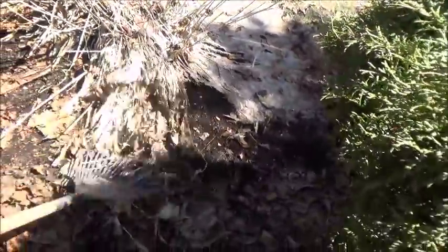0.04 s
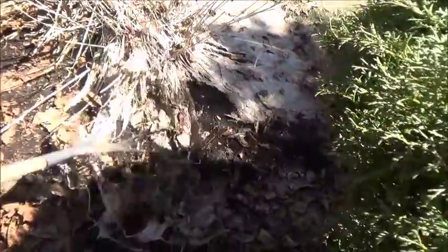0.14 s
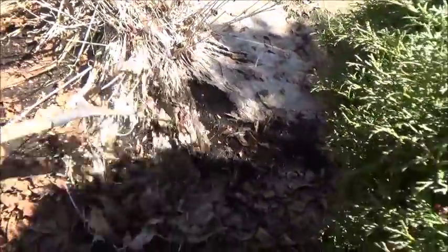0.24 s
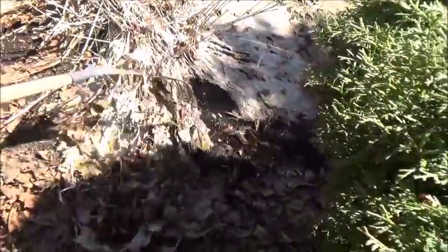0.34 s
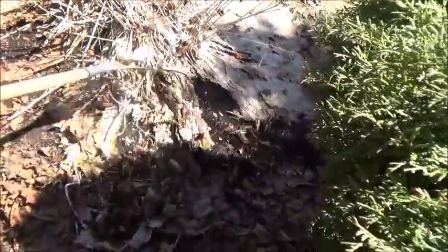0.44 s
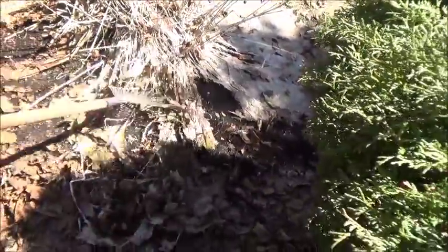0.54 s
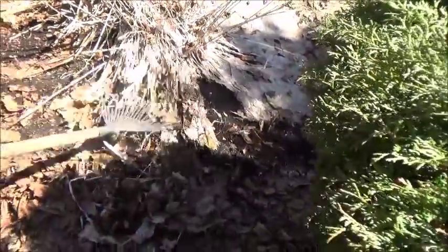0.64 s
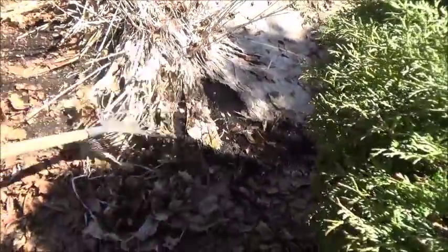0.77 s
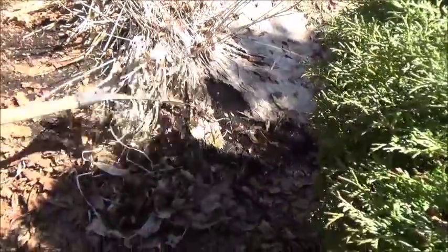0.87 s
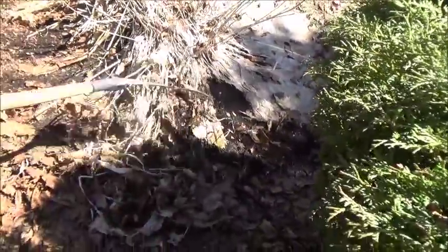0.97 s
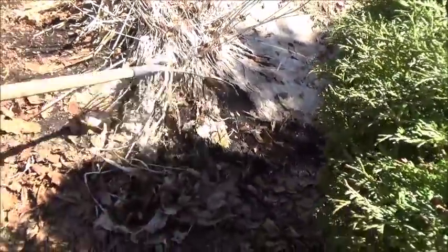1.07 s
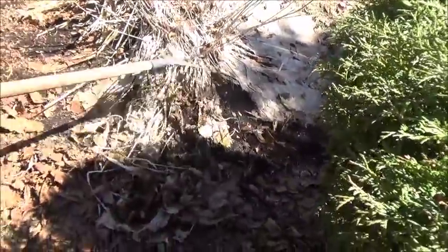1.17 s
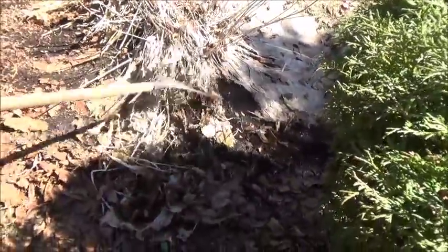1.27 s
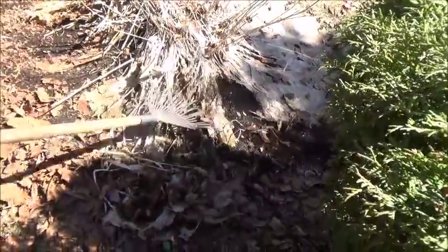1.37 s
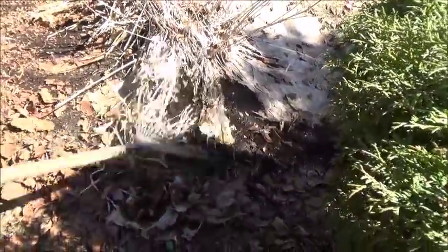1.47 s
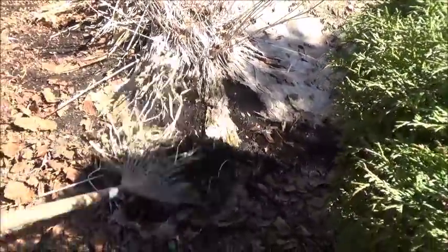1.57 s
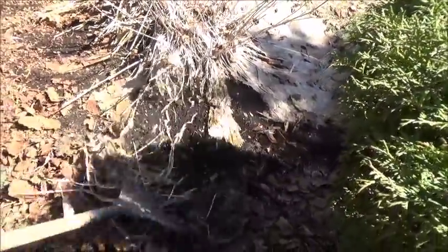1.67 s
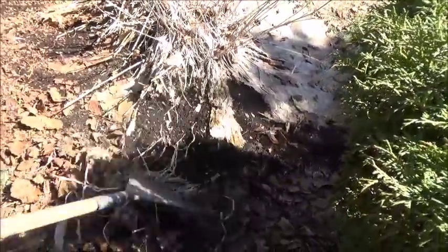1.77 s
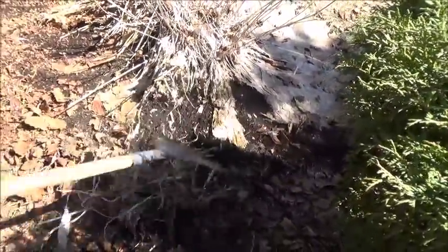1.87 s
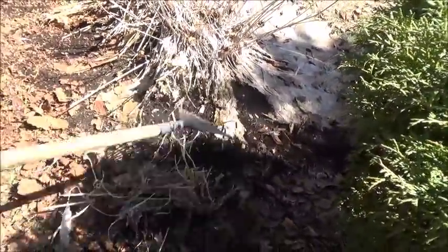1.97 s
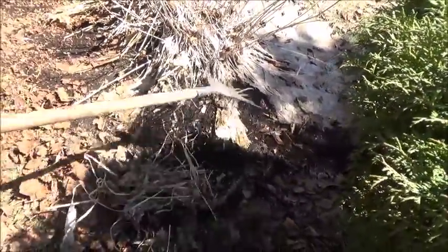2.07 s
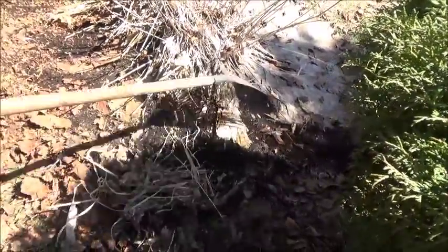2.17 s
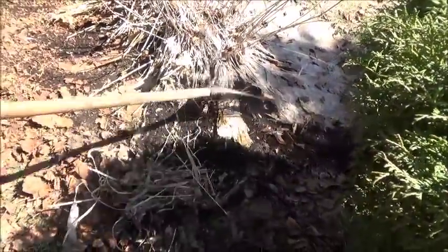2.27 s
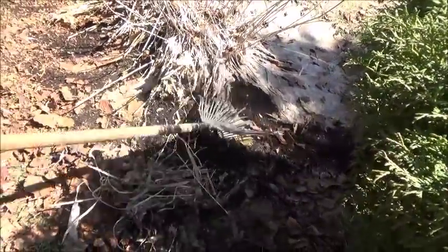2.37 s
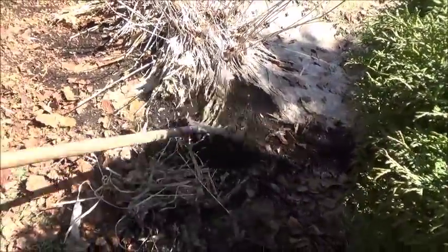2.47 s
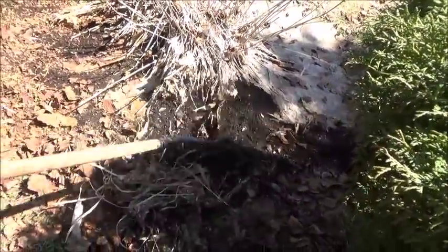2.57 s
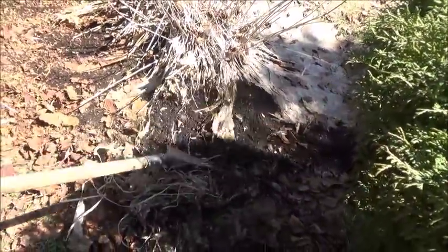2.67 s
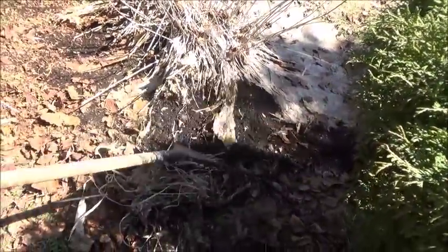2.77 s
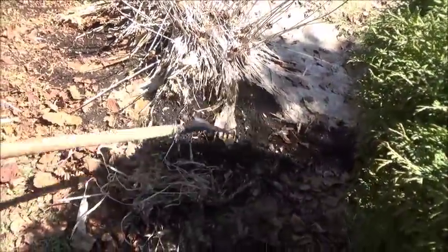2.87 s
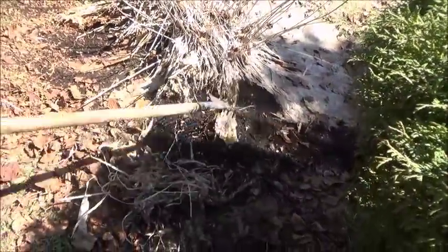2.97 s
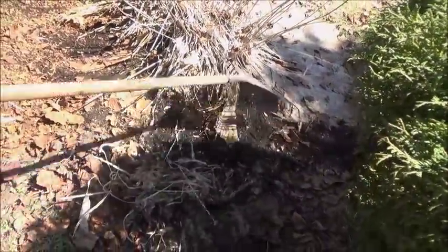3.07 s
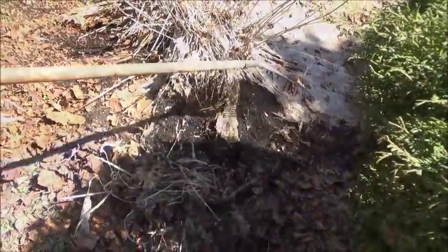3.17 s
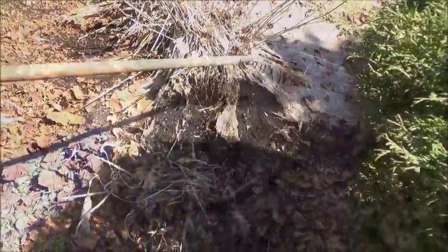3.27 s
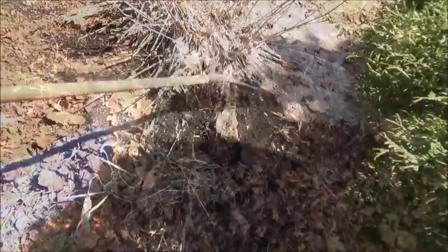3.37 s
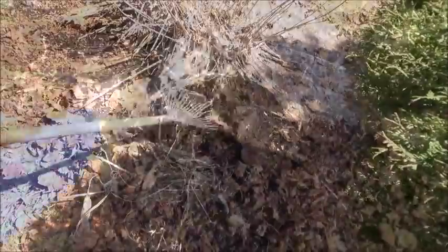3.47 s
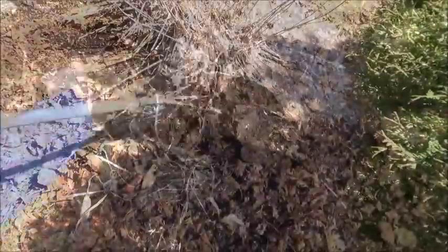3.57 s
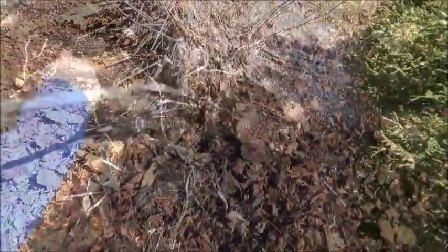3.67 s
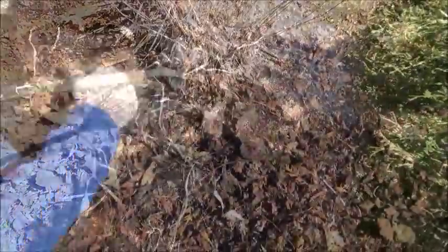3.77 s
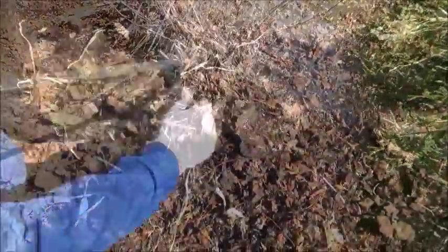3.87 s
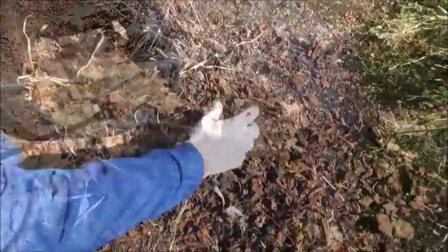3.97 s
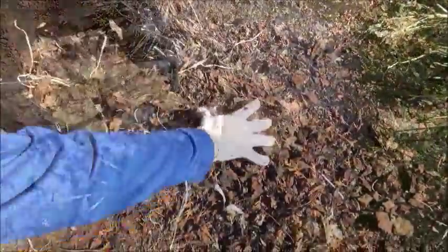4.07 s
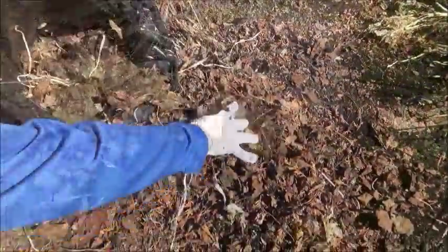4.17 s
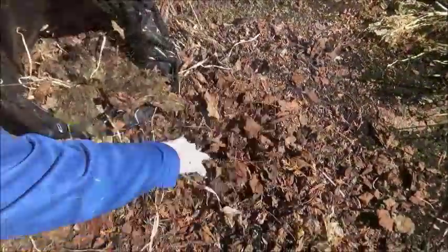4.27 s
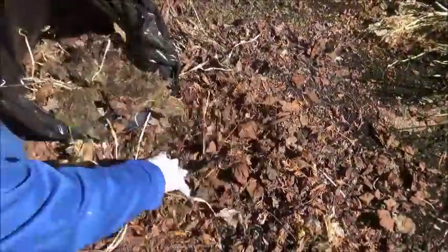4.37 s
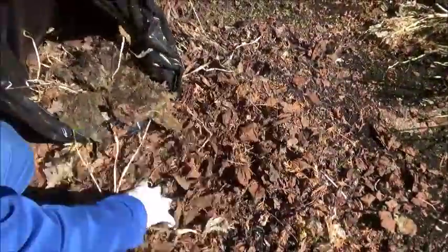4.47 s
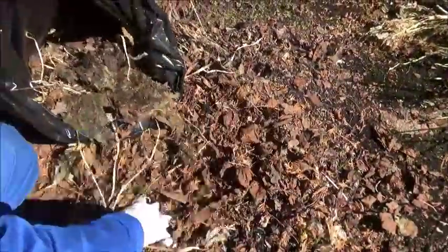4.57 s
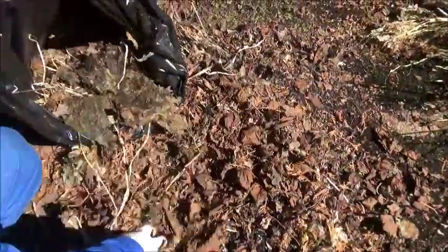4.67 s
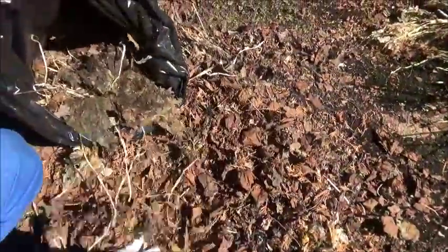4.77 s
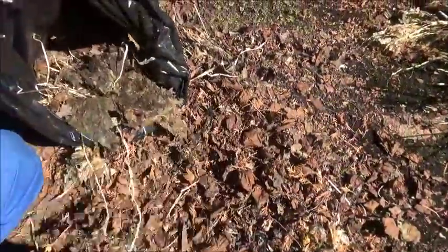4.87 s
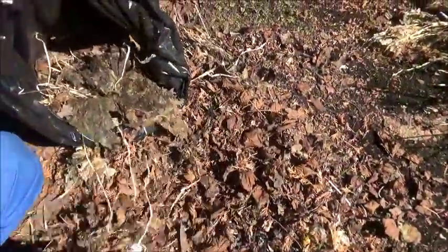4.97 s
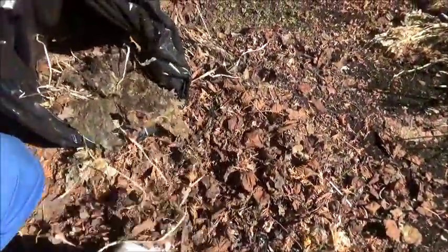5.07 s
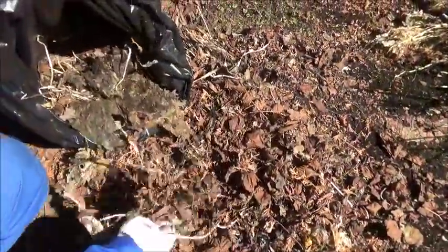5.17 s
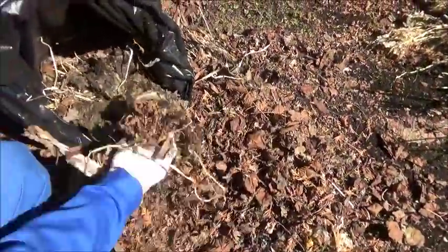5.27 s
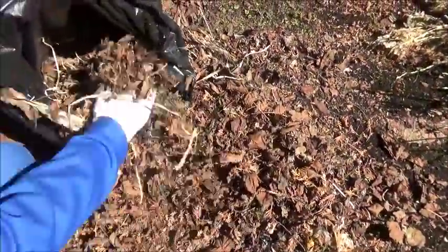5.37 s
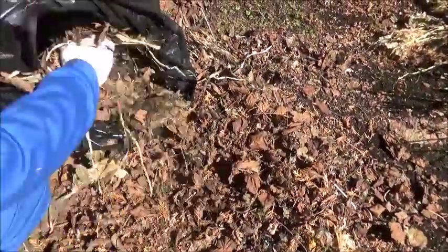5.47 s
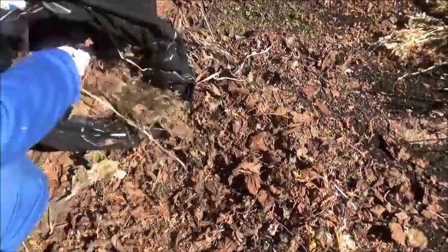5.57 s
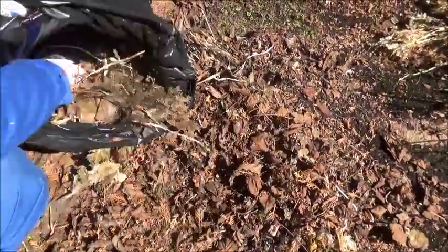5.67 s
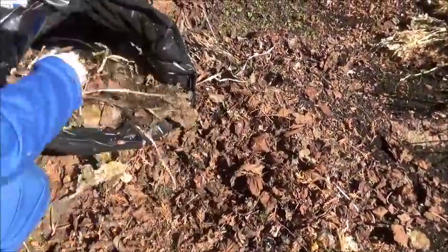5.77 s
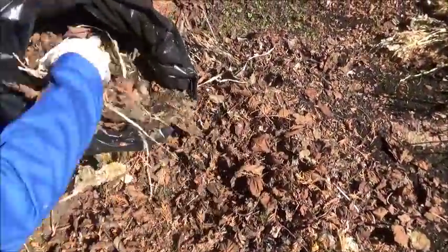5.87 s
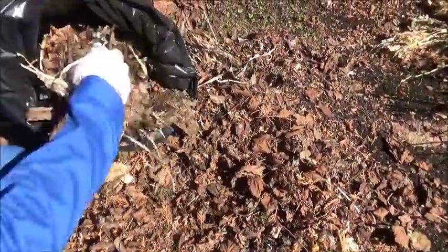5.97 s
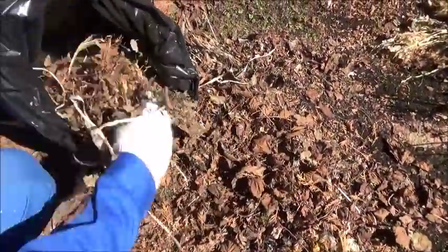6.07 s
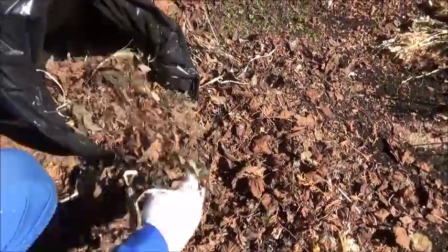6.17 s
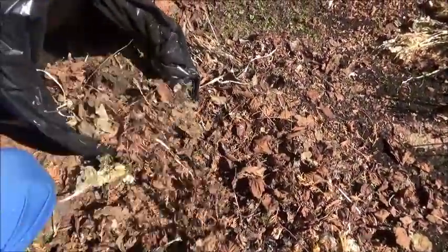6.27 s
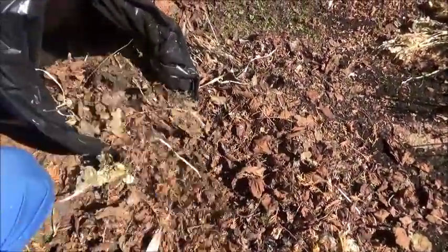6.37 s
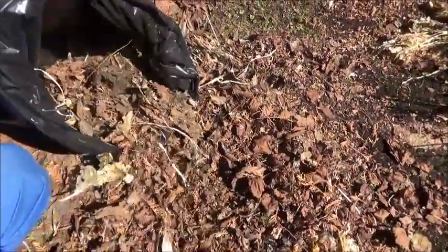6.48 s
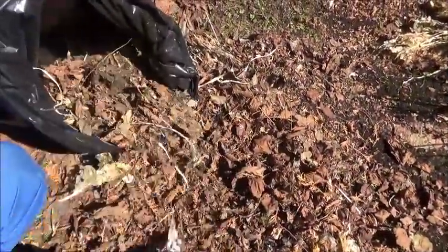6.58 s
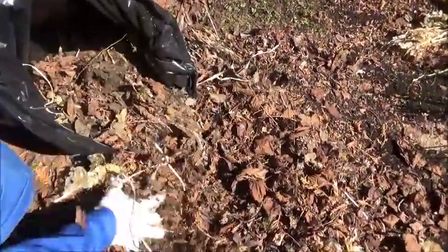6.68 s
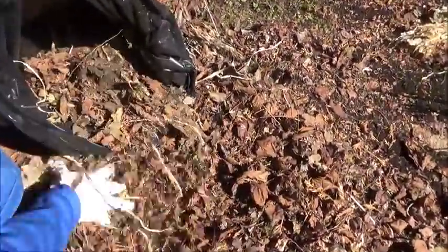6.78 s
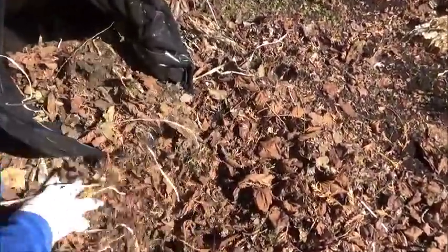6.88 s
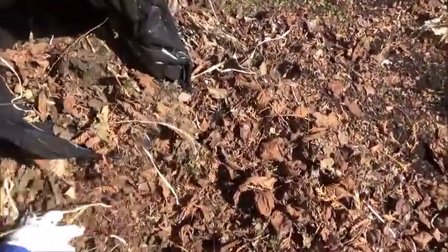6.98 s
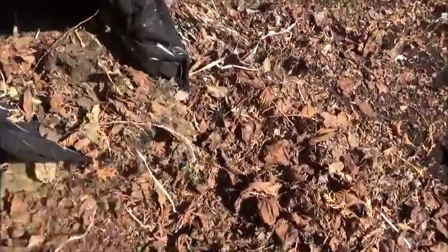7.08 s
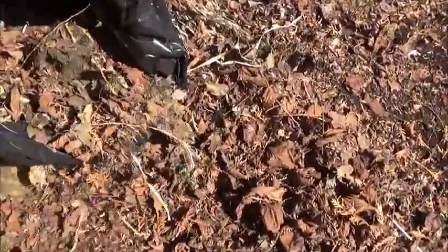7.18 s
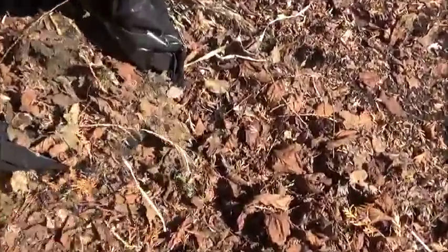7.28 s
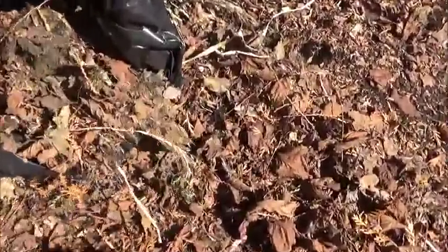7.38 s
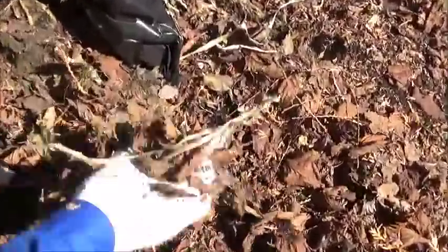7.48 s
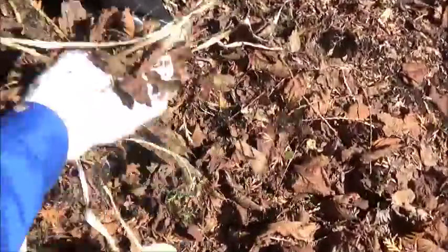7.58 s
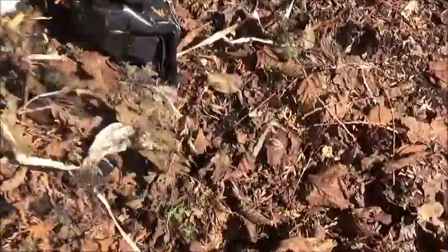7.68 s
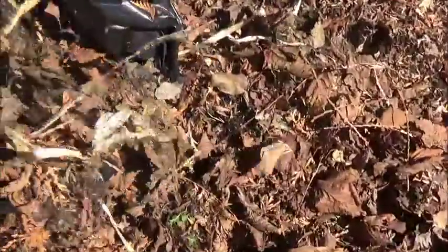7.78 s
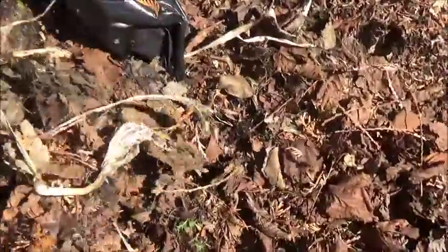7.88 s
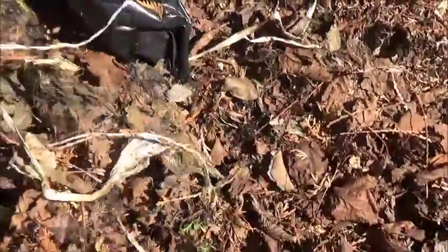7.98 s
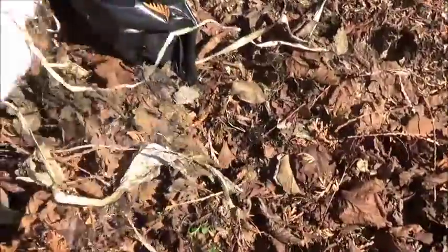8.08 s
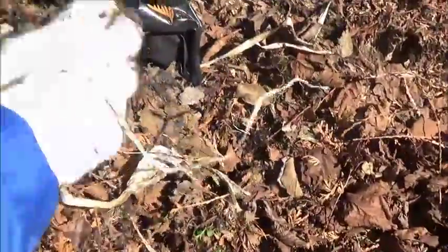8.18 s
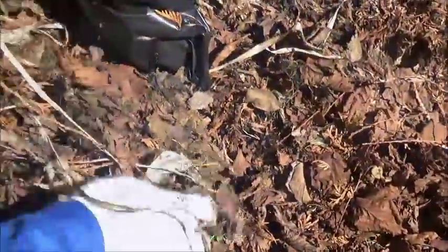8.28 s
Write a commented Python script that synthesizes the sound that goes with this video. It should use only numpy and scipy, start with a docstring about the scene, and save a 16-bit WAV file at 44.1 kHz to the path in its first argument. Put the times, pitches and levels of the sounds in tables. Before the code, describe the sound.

Dry leaves crackle and twigs snap under repeated rake strokes, the metal tines ticking faintly, with a faint low hum behind. Then a hand gathers the leaves in several crisp, rustling scoops and pushes them into a plastic sack, which adds a soft hollow sound. The work is outdoors, close by and a little to the left, over a quiet rumble and slight air movement at the microphone.

```python
"""Dry leaves crackle under a rake, close to the microphone and a little to its left.
Each stroke is thousands of tiny fractures; stiffer twigs snap out of the mass and the steel tines ring on.
From about four seconds a gloved hand scoops the litter into a plastic sack; heap and sack add a dull body.
Air stirs at the microphone over a distant rumble, and a low hum stands behind the raking.
Near the end something bumps softly and a faint tone rises."""
import sys
import numpy as np
from scipy import signal
from scipy.fft import rfft, irfft, next_fast_len
from scipy.io import wavfile
from scipy.ndimage import map_coordinates

SR = 44100
rng = np.random.default_rng(int(sys.argv[2]) if len(sys.argv) > 2 else 0)


def dump_mix(stems):
    """Bounce the given channels to the path in sys.argv[1] as a 16-bit WAV at rate SR."""
    frames = np.atleast_2d(stems).T  # one column per channel
    limited = np.clip(frames, -1, 1)  # hard clip at full scale
    pcm = np.round(limited * 32767).astype(np.int16)
    wavfile.write(sys.argv[1], SR, pcm)


N = 367353
TIME_S = np.arange(N) / SR
HAND_FROM_S = 3.945  # the scene changes: raking before, the gloved hand after


def amp(db):
    """Gain of a level in dB."""
    return 10 ** (np.asarray(db) / 20)


def along(points, hz):
    """Read (pitch_hz, value) points on a log pitch axis."""
    pitches, values = np.transpose(points)
    return np.interp(np.log(hz + 1), np.log(pitches + 1), values)


def curves(rows):
    """One value per sample for each column after the time."""
    times, *columns = np.transpose(rows)
    return [np.interp(TIME_S, times, column) for column in columns]


def wobble(per_s):
    """A smooth random curve with per_s knots a second."""
    knots = rng.standard_normal(int(N / SR * 200) + 4)
    return map_coordinates(knots, [TIME_S * per_s])


def filtered(x, response):
    """Shape x by a gain that depends on frequency."""
    size = next_fast_len(N + 8192)
    return irfft(rfft(x, size) * response(np.fft.rfftfreq(size, 1 / SR)), size)[..., :N]


def thinned(x):
    """Roll off the bass below 700 Hz, leaving clicks dry."""
    return filtered(x, lambda hz: hz ** 4 / (hz ** 4 + 700 ** 4))


def dying(power, t60):
    """Every impulse of power fades over t60 seconds; the mean is kept."""
    keep = amp(-120 / (t60 * SR))
    return signal.lfilter([1 - keep], [1, -keep], power)


def fractures(per_s, spread_db):
    """Tiny breaks at random times: impulses of power, mean about 1, all equal if spread_db is 0."""
    size = amp(2 * spread_db * np.minimum(rng.exponential(size=N), 4))
    return (rng.random(N) < per_s / SR) * size / np.mean(size) * SR / per_s


def pings(start_s, db, hz, t60):
    """Damped sines that swell over a fraction of a cycle and are cut off after 25 ms."""
    age = np.arange(1100)
    turns = hz[:, None] * age / SR
    decay = amp(db[:, None] - 60 * age / SR / t60[:, None])
    rings = decay * np.sin(2 * np.pi * turns) * (1 - np.exp(-turns / 0.17))
    at = np.round(start_s * SR).astype(int)[:, None] + age
    return np.bincount(at.ravel(), rings.ravel(), N + len(age))[:N]


def swells(start_s, end_s, db, end_db, rise, fall, bed_db):
    """Level in dB of sounds that rise, hold and fall, summed over a bed."""
    t = TIME_S[::32, None]
    hold = db + (end_db - db) * np.clip((t - start_s) / np.maximum(end_s - start_s, 1e-3), 0, 1)
    level = hold - rise * np.maximum(start_s - t, 0) - fall * np.maximum(t - end_s, 0)
    power = np.interp(TIME_S, t[:, 0], amp(2 * level).sum(axis=1))
    return 10 * np.log10(power + amp(2 * bed_db))


def stray_breaks(leaf_db, over_db, scatter_db, count):
    """Random times, levels above the stroke of the moment, and a 0-1 place in a pitch range."""
    when, size, place = rng.random((count, 3)).T
    db = leaf_db[(when * N).astype(int)] + over_db + scatter_db * (size - .5)
    return when * (N - 1) / SR, db, place


# Width of the litter from the microphone: pitch_hz, side_minus_mid_db
SIDE_SPECTRUM = [(60, -21), (250, -20), (550, -20), (1500, -15), (2700, -14), (4500, -20), (8000, -14),
                 (12000, -20)]


def voiced(power, colour):
    """Coloured noise under a power envelope; unrelated mid and side give it width."""
    colour_rms = np.sqrt(np.mean(amp(2 * along(colour, np.linspace(0, SR / 2, 4000)))))
    shape = lambda hz: amp(along(colour, hz) + np.array([0 * hz, along(SIDE_SPECTRUM, hz)])) / colour_rms
    return filtered(np.sqrt(power) * rng.standard_normal((2, N)), shape)


# Strokes of rake, then hand, on the ground close by:
# full_s, release_s, level_db, release_db, rise_db_per_s, fall_db_per_s
STROKES = [(0, 0.146, -15.5, -16, 502, 123), (0.302, 0.48, -29.5, -27.5, 105, 302),
           (0.511, 0.579, -17, -18, 799, 280), (0.685, 0.833, -13.5, -19, 253, 115),
           (0.923, 1.01, -37, -28.5, 100, 75), (1.18, 1.312, -29, -43, 405, 206),
           (1.336, 1.699, -17, -14.5, 130, 93), (1.825, 2.062, -24.5, -25, 200, 402),
           (2.065, 2.2, -31.5, -35.5, 300, 600), (2.247, 2.356, -27, -23.5, 500, 300),
           (2.378, 2.66, -20, -24, 285, 222), (2.707, 2.81, -27, -37.5, 200, 144),
           (2.857, 3.022, -26.5, -25.5, 150, 600), (3.073, 3.162, -21.5, -19.5, 702, 902),
           (3.174, 3.242, -17.5, -22.5, 900, 498), (3.288, 3.288, -29, -26, 500, 350),
           (3.356, 3.427, -24, -13.5, 900, 900), (3.439, 3.554, -16, -17, 900, 200),
           (3.61, 3.73, -23, -27, 300, 66), (3.939, 3.94, -29, -25.5, 250, 1502),
           (4.229, 4.546, -15, -16.5, 342, 87), (4.716, 4.774, -16, -19.5, 143, 172),
           (4.846, 5.036, -16.5, -19.5, 214, 62), (5.203, 5.42, -30, -28, 102, 202),
           (5.491, 5.619, -18.5, -24.5, 252, 69), (5.783, 6.017, -34, -32, 100, 200),
           (6.026, 6.24, -35, -25, 200, 193), (6.393, 6.49, -15, -16.5, 92, 227),
           (6.59, 6.947, -13, -18, 201, 902), (6.962, 7.345, -16.5, -16.5, 900, 142),
           (7.408, 7.606, -25, -28.5, 196, 203), (7.702, 7.844, -16.5, -23.5, 203, 81),
           (7.947, 8.148, -28.5, -41.5, 192, 22)]


def strokes():
    """Level in dB of the stirred leaves, which go on settling quietly between strokes."""
    return swells(*np.transpose(STROKES), bed_db=-41)


# What is being stirred, and where: time_s, woody_db, treble_db, left_bias_db
PATCH = [(0, 1, 2, 2.5), (.28, -2.5, -1, 1.5), (.52, -1.5, 2.5, 3), (.62, -1.5, 2, 1), (.8, -1, 3.5, 1),
         (1.0, -1.5, 0, 4.5), (1.15, -2, 1.5, 0.5), (1.35, -3, 2, 0.5), (1.47, -1, 4, 1),
         (1.56, 0.5, 1.5, 2.5), (1.72, 0.5, 0, 0.5), (1.8, -0.5, 0.5, 2.5), (1.9, -1.5, -0.5, 4.5),
         (2.12, -1.5, 1, 2), (2.3, -0.5, 2, 0.5), (2.6, -3, 3, 0.5), (2.75, -2, 1, 3.5),
         (2.83, 1.5, -2.5, 7.5), (2.95, 2.5, -2.5, 9.5), (3.05, 3, -4, 7.5), (3.15, 3.5, -4.5, 8),
         (3.3, -0.5, -3, 6.5), (3.42, -1.5, 4, 0), (3.55, 2.5, 5, 1.5), (3.66, 1.5, 2.5, 2.5),
         (3.9, 1, -0.5, 3.5), (4.15, 2, 2.5, 3.5), (4.23, 1, 4, -1), (4.33, 4.5, -1, 0.5),
         (4.52, 4.5, -2.5, 3), (4.72, -1, -1, 1.5), (4.81, 1.5, -3, 2), (4.88, 4.5, -1.5, 3),
         (5.05, 1.5, -1, 2.5), (5.35, -3, 1.5, 2), (5.65, 6.5, 0, 4.5), (6.1, 1.5, 2.5, 3.5),
         (6.5, -3.5, 0.5, -0.5), (6.7, 0.5, 1.5, 0.5), (6.95, 3, -0.5, 5.5), (7.1, 1, -4, 4.5),
         (7.22, 1, -1.5, 1.5), (7.36, -3, -2.5, 0), (7.55, -4.5, 0, 0), (7.78, 5, 3, 3),
         (8.0, 2.5, -0.5, 3), (8.33, 0, 6.5, 1)]
# Colours of the litter at close range: pitch_hz, density_db
LEAF = [(3000, -70), (5000, -17.5), (6800, -5), (8000, -0.5), (8800, 0), (9700, -2), (10500, -9),
        (13000, -18)]
DUST = [(5000, -66), (8000, -5.5), (10500, 0.5), (11500, -1.5), (12700, -3.5), (14000, -11.5), (15600, -22),
        (17000, -27)]
COARSE = [(1500, -70), (3000, -23), (4200, -5), (5500, -1.5), (6800, -0.5), (9000, -12), (14000, -60)]
TWIG = [(200, -68), (500, -12.5), (1100, -7), (2100, -0.5), (3300, 0.5), (4200, -2), (6000, -8.5),
        (12000, -58)]
HEAP = [(60, -65), (150, -22), (320, -6.5), (600, 3.5), (800, 0), (1100, -1.5), (1900, -9.5), (5000, -62)]
FISTFUL = [(350, -60), (600, -5), (800, -6), (1150, -8), (1500, -7), (2000, -6.5), (3200, -18), (6000, -70)]  # crunched in the glove


def litter(leaf_db):
    """Leaves, dust, twigs and heap break together; harder stirring packs the fractures closer."""
    woody_db, treble_db, _ = curves(PATCH)
    raking = TIME_S < HAND_FROM_S
    weak_db = -20 - leaf_db  # how far below a firm stroke
    dust_db = -6.5 + .1953 * weak_db + 1.5 * treble_db
    coarse_db = -7.5 + .28 * weak_db + .89 * woody_db + .5 * treble_db
    twig_db = -9 + .2618 * weak_db + woody_db
    heap_db = -20.5 + .7563 * weak_db + 2.01 * woody_db + treble_db
    heap_db += np.where(raking, 0, -7)  # fingers stir the heap less than tines
    per_s = 1600 * amp(0.36 * (leaf_db + 26))
    # Tines break fewer and larger pieces than fingers.
    shared = np.where(raking, fractures(.6 * per_s, spread_db=0), fractures(per_s, spread_db=0))
    own = fractures(per_s / 2, spread_db=2)
    lumpy = np.clip(1 - (leaf_db + 24) / 12, .2, 1)  # above -24 dB a stroke rustles more evenly
    # Tines and fingers catch and let go.
    clumps = amp(lumpy * (0.76 * wobble(12) + 2.6 * wobble(30) + 2.1 * wobble(90)))
    clumps /= np.mean(clumps)
    layers = ((LEAF, -.6, .004, .25, .5),
              (DUST, dust_db, .004, .3, .45),
              (COARSE, coarse_db, .006, .25, .5),
              (TWIG, twig_db, .011, .3, .45),
              (HEAP, heap_db, .02, .25, .3),
              (FISTFUL, np.where(raking, -90, -26), .012, .1, .3))
    rustle = 0
    for colour, above_db, t60_s, hiss_share, common_share in layers:
        own = np.roll(own, N // len(layers))  # each layer breaks at its own moments
        breaks = common_share * shared + (1 - hiss_share - common_share) * own
        grain = hiss_share + dying(breaks, t60_s)
        power = clumps * (1 + np.sqrt(lumpy) * (grain - 1))
        rustle = rustle + voiced(power * amp(2 * (leaf_db + above_db)), colour)
    rustle[0] += thinned(stems(leaf_db + twig_db, count=1200))
    return rustle


def stems(level_db, count):
    """Small stems break at random, each a dry click of 5 to 27 cycles."""
    when, smallness, place, life = rng.random((count, 4)).T
    hz = 1000 * 4.5 ** place
    db = level_db[(when * N).astype(int)] + 3 - 2.3 * np.log(smallness + 0.035)
    return pings(when * N / SR, db, hz, (5 + 22 * life) / hz)


def flakes(leaf_db):
    """Single leaves crack out of the rustle as very short bright clicks."""
    start_s, db, place = stray_breaks(leaf_db, over_db=9, scatter_db=7, count=700)
    hz = 6500 * 1.53 ** place
    return pings(start_s, db, hz, t60=10 / hz)


# Rumble in the distance: time_s, level_db
RUMBLE = [(0.0, -46), (0.14, -57), (3.78, -50), (4.6, -60), (5.1, -61), (5.73, -50), (6.49, -59),
          (7.98, -52), (8.33, -52)]
# Heap and sack shoved close by: start_s, level_db, fall_db_per_s
SHOVES = [(.51, -50, 70), (1.32, -49, 152), (2.39, -47, 150), (3.411, -50, 150), (3.525, -38, 600),
          (3.67, -47, 45), (4.45, -45, 115), (5.42, -42, 16), (5.61, -39.5, 53), (5.89, -43, 58),
          (6.12, -46.5, 57), (7.78, -36, 60)]
# Colour of both: pitch_hz, density_db
DULL = [(20, -55), (50, -14), (95, -7.5), (180, -1), (280, -2.5), (450, -6.5), (1500, -60)]


def rumble_and_shoves():
    """Dull shoves of heap and sack swell out of a distant rumble."""
    start_s, db, fall = np.transpose(SHOVES)
    level_db = swells(start_s, start_s, db, db, rise=218, fall=fall, bed_db=curves(RUMBLE)[0])
    return voiced(amp(1.976 * (level_db + 0.8 * wobble(25))), DULL)


# Air right at the microphone: time_s, level_db
AIR = [(0, -60), (.95, -60), (1.6, -60), (2.7, -57), (3.7, -63), (4.2, -67), (5.3, -65), (5.6, -64),
       (6.8, -71), (7.2, -69), (8.33, -59)]
# Its colour: pitch_hz, density_db
PUFF = [(15, -29), (28, -11), (50, -8), (90, -4), (150, -25), (500, -70)]


def air():
    """Air stirs at the microphone in low, uneven puffs."""
    return voiced(amp(2 * (curves(AIR)[0] + 2.6 * wobble(7.3))), PUFF)


# Low hum behind the raking: time_s, pitch_hz, level_db
HUM = [(0, 69.5, -68), (.3, 70.6, -58), (.7, 70.4, -54), (.87, 70.4, -62), (1.05, 72, -53),
       (1.3, 71.4, -63), (1.6, 71.9, -70), (2.3, 70.9, -65), (2.55, 70, -54), (3.02, 69.8, -51),
       (3.18, 71, -55), (3.3, 70.5, -53), (3.99, 69, -55)]
# Faint rising tone near the end: time_s, pitch_hz, level_db
RISING_TONE = [(7.2, 194, -65), (7.3, 192, -58), (7.61, 204, -54), (7.67, 215, -54), (7.75, 214, -54)]


def background_tone(rows, waver_db):
    """A slightly unsteady sine that fades in and out at its ends."""
    hz, db = curves(rows)
    fade = np.clip(np.minimum(TIME_S - rows[0][0], rows[-1][0] - TIME_S) / 0.077, 0, 1)
    return np.sqrt(2) * fade * amp(db + waver_db * wobble(7.7)) * np.sin(2 * np.pi * np.cumsum(hz) / SR)


# Single leaves snapping close by: start_s, level_db, pitch_hz, woody_above_db
LEAF_SNAPS = [(0.1559, -5, 7600, -5), (0.218, -19, 8500, -5), (0.229, -16, 7500, -18),
              (0.2483, -16, 8800, -15), (0.268, -8, 7600, -21), (0.2789, -14, 8200, -19),
              (0.3659, -14, 8400, -18), (0.4182, -17, 7900, -4), (0.4773, -5, 8300, -17),
              (0.4808, -8, 8700, -13), (0.4906, -9, 9100, -22), (0.501, -8, 8000, -13),
              (0.505, -2, 6200, -22), (0.6476, -6, 8500, -20), (0.831, -5, 7800, -22),
              (0.846, 0, 9700, -24), (0.8866, -5, 10100, -25), (0.9137, -14, 6600, -12),
              (0.9497, -21, 7850, -17), (0.9573, -19, 8700, -18), (1.0089, -9, 9600, -19),
              (1.0708, -23, 6200, -10), (1.0775, -17, 9800, -18), (1.1033, -18, 9500, -7),
              (1.1281, -25, 7900, -13), (1.1569, -20, 8130, -14), (1.166, -15, 7300, -14),
              (1.175, -10, 9000, -23), (1.1868, -8, 8400, -20), (1.302, -5, 9600, -16),
              (1.3088, -2, 8600, -20), (1.361, 2, 8600, -25), (1.3676, -4, 8300, -28),
              (1.3778, -5, 9100, -19), (1.3868, 3, 7300, -16), (1.5033, -11, 8000, -12),
              (1.5577, -6, 9700, -16), (1.58, -1, 8400, -19), (1.7097, -4, 8000, -15),
              (1.732, -4, 8300, -15), (1.7545, -8, 8300, -21), (1.8713, -11, 6700, -5),
              (1.8761, -12, 6900, -1), (1.889, -12, 8500, -22.5), (1.8962, -8, 8400, -12),
              (1.9316, -4, 8000, -18), (1.9418, -5, 7900, -19), (1.9718, -6, 9400, -20),
              (2.0025, -9, 8600, -24), (2.051, -1.5, 8900, -24), (2.1005, -14, 9700, -17),
              (2.1127, -12, 8900, -16), (2.1271, -17, 9000, -15), (2.1448, -9, 9100, -20),
              (2.1746, -11, 8900, -24), (2.1815, -14, 8900, -20), (2.2045, -12, 8400, -2),
              (2.243, -15, 8300, -6), (2.259, -9, 8100, -10), (2.277, -3.5, 8600, -10),
              (2.2831, -11, 9400, -15), (2.3036, -8, 9600, -21), (2.3164, -3, 9100, -13),
              (2.35, -8, 8900, -9), (2.3721, -7, 9040, -21), (2.378, -4, 9500, -26),
              (2.4302, -4, 8440, -22), (2.4347, -6, 8000, -2), (2.443, -13, 9300, -25),
              (2.4611, -6, 9200, -19), (2.4656, -9, 8800, -18), (2.476, -4, 8800, -18),
              (2.53, -14, 8000, -6), (2.5486, -18, 9000, -12), (2.5711, -14, 8250, -13),
              (2.602, -8, 8200, -22), (2.621, -2, 8100, -22), (2.6861, -14, 8000, -2),
              (2.7244, -10, 6500, -11), (2.7448, -18, 8300, -17), (2.7708, -16, 6400, -7),
              (2.7816, -11, 8700, -19), (2.823, -12, 6800, -6), (2.8358, -20, 7900, -7),
              (2.8404, -18, 7300, -2), (2.855, -13, 6700, 1), (2.8606, -20, 5900, -6),
              (2.9273, -7.5, 6350, -17), (2.9787, -7, 6500, -14), (3.016, -3, 5600, -20),
              (3.0471, -15, 5700, -12), (3.0639, -9, 6700, 0), (3.0678, -15, 6000, -11),
              (3.073, -15, 7600, -19), (3.0853, -4, 5100, -6), (3.0968, -4, 5400, -12),
              (3.1424, -5, 8200, -7), (3.159, -11, 6800, -14), (3.1627, -11, 7600, -7),
              (3.167, -14, 7700, -11), (3.1876, -11, 7300, -9), (3.1937, -6, 7700, -16),
              (3.2228, -5, 7900, -19), (3.2325, -8, 7700, -15), (3.2402, -9, 8100, -9),
              (3.2474, -7, 7100, -13), (3.27, -13, 7700, -15), (3.2796, -17, 7700, -7),
              (3.292, -14, 5900, -12), (3.298, -15, 8100, 1), (3.3037, -16, 8000, -19),
              (3.3205, -26, 7400, -18), (3.3359, -19, 8500, -17), (3.3481, -14, 5500, -7),
              (3.3576, -9, 7400, -22), (3.362, -8, 8200, -20), (3.3758, -4, 9440, -17),
              (3.6066, -7, 7800, -20), (3.71, -7, 8500, -17), (3.793, -17, 9000, -16),
              (3.8432, -24, 8500, -12), (3.8708, -24, 6400, 8), (3.9336, -15, 8550, -12),
              (3.9377, -17, 7300, -12), (3.944, -15, 9200, -15), (3.9596, -22, 9600, -15),
              (3.976, -18, 5500, -5), (4.0092, -14, 8300, -22), (4.014, -17, 9300, -6),
              (4.0532, -26, 8900, -17), (4.0581, -19, 7500, -3), (4.104, -13, 7500, -8),
              (4.1237, -29, 8500, -21), (4.138, -15, 9700, -18), (4.1643, -15, 8300, -20),
              (4.1773, -13, 8100, -19), (4.1904, -3.5, 8500, -19), (4.266, -4, 8500, -20),
              (4.3194, -2, 9500, -20), (4.6885, -8, 8300, -20), (4.8135, -4, 8500, -20),
              (4.9499, -6, 7500, -17), (4.9758, -1.5, 9100, -20), (5.009, 0, 8600, -17),
              (5.0636, -6, 8000, -15), (5.1242, -8, 8500, -18), (5.253, -13, 8700, -15),
              (5.2727, -10, 8500, -9), (5.3666, -10, 8900, -22), (5.3763, -12, 9000, -21),
              (5.3903, -5, 9700, -23), (5.4215, -8, 9100, -16), (5.4264, -10, 6200, -17),
              (5.5709, -5, 8600, -12), (5.5892, -2.5, 8700, -21), (5.839, -12, 8500, -14),
              (5.8771, -22, 7300, -10), (6.0427, -8, 9800, -21), (6.052, -11, 9200, -16),
              (6.1066, -11, 7100, -16), (6.2289, -16, 8100, 2), (6.2371, -5, 9000, -19),
              (6.2692, -6, 9100, -20), (6.284, -3, 9100, -15), (6.292, -0.5, 8000, -22),
              (6.322, -2, 7700, -22), (6.3986, -6, 8400, -18), (6.4864, -4, 8700, -21),
              (6.5013, -2, 8100, -28), (6.5694, 0, 9200, -14), (6.9354, -7, 8350, -17),
              (6.957, -2, 8500, -22), (6.973, -9, 8500, -18), (7.1142, -2, 8800, -14),
              (7.1475, -2, 8500, -18), (7.23, -6, 8100, -16), (7.35, -6, 8800, -26),
              (7.3709, -6, 8300, -22), (7.45, -6, 8700, -16), (7.4642, -9, 8350, -22),
              (7.523, -7, 8000, -22), (7.537, -4, 9300, -18), (7.5591, -17, 8200, -20),
              (7.5687, -13, 9200, -17), (7.578, -15, 8500, -18), (7.616, -8, 8800, -24),
              (7.6333, -9, 9200, -11), (7.6767, -7, 6600, -10), (7.689, -5, 8200, -15),
              (7.694, -7, 8900, -20), (7.843, 1, 8340, -14), (7.9366, -8, 8300, -14),
              (7.942, -11, 8700, -6), (8.0166, -22.5, 6900, 14.5), (8.0321, -20, 8400, -11),
              (8.0747, -12, 8600, -14), (8.0814, -13, 8300, -12), (8.1407, -17, 6200, -9),
              (8.1455, -13, 7900, -18), (8.1627, -23, 7000, -18), (8.1771, -11, 9200, -19),
              (8.2173, -16, 9300, -11), (8.2692, -12, 8500, -13)]


def leaf_snaps():
    """A leaf snaps with a crisp click, a lower woody one and a shower of crumbs."""
    crisp_cycles, woody_cycles, shower_s = 20, 5.9, 0.014
    start_s, db, hz, woody_db = np.transpose(LEAF_SNAPS)
    woody_hz = 2720 * np.exp(rng.normal(0, .25, len(start_s)))
    clicks = pings(start_s, db - 3.5, hz, crisp_cycles / hz)
    clicks += pings(start_s, db + woody_db + 1, woody_hz, woody_cycles / woody_hz)
    impulses = np.zeros(N)
    impulses[np.round(start_s * SR).astype(int)] = amp(2 * (db - 9)) * shower_s * SR / np.log(1e6)
    crumbs = dying(impulses, shower_s)
    snaps = voiced(crumbs, LEAF) + amp(-19) * voiced(crumbs, DUST) + amp(-12) * voiced(crumbs, COARSE)
    snaps[0] += thinned(clicks)
    return snaps


# Stems cracking and tines ticking close by: start_s, level_db, pitch_hz
CRACKS = [(0.2169, -26, 2400), (0.4718, -14, 3670), (0.5048, -19, 5800), (0.526, -14, 4500),
          (0.535, -12, 4500), (0.5686, -11, 4020), (0.6644, -16, 4480), (0.7841, -18, 4370),
          (1.2865, -14, 4500), (1.3094, -6.5, 2470), (1.315, -15, 1950), (1.322, -11, 2400),
          (1.3768, -28, 4030), (1.3857, -23, 4570), (1.5344, -7, 4500), (1.8754, -16, 1580),
          (1.9155, -17, 2060), (1.924, -20, 2080), (1.93, -11, 5500), (1.982, -16, 2040),
          (2.128, -25, 1140), (2.136, -26, 3900), (2.2034, -26, 4320), (2.204, -19, 1850),
          (2.2428, -16, 3300), (2.258, -13, 1830), (2.2757, -13.5, 3200), (2.3146, -17, 2010),
          (2.3531, -12, 2300), (2.3738, -16, 2840), (2.4339, -14, 1970), (2.476, -14, 3130),
          (2.5306, -9, 2120), (2.5486, -15, 2060), (2.61, -18, 3670), (2.6662, -12, 3100),
          (2.723, -22, 1700), (2.8392, -12, 3380), (3.015, -18, 2850), (3.0629, -12, 2210),
          (3.0844, -13, 4000), (3.1173, -11, 3160), (3.097, -14, 1580), (3.1343, -7, 3000),
          (3.141, -6, 3050), (3.167, -16, 2210), (3.217, -13, 2780), (3.2458, -7.5, 2430),
          (3.289, -18, 2120), (3.3473, -11.5, 3220), (3.3752, -13, 4200), (3.3943, -10, 4230),
          (3.4236, -20, 2100), (3.462, -5, 2500), (3.4994, -3.5, 2900), (3.5249, -8, 1200),
          (3.558, -21, 3650), (3.607, -7, 3680), (3.9749, -21, 2250), (4.1053, -14.5, 3260),
          (4.2014, -21, 2590), (4.2211, -4, 2080), (4.3, -11, 2230), (4.375, -11, 2700),
          (4.6713, -22, 4340), (4.817, -22, 2840), (4.9696, -11, 2310), (4.918, -4, 1590),
          (5.053, -13, 1010), (5.2724, -13.5, 3900), (5.4784, -11, 3160), (5.495, -9, 4120),
          (5.6251, -23, 4490), (5.6755, -11, 2430), (5.9155, -21, 4360), (6.216, -21, 3840),
          (6.2277, -13, 2560), (6.2821, -22, 3980), (6.3709, -6, 3830), (6.5645, -13, 3230),
          (6.575, -11, 4360), (6.6214, -16, 2800), (6.6603, -18, 2360), (6.7131, -16, 3290),
          (6.8155, -8, 2700), (6.846, -19, 1500), (6.8698, -11, 3280), (6.9306, -9, 4010),
          (7.051, -8, 4280), (7.0873, -6, 2940), (7.1164, -5.5, 1930), (7.3043, -14, 4140),
          (7.3437, -20, 4470), (7.6765, -11, 3720), (7.6899, -10, 3070), (7.7095, -7, 2240),
          (7.7478, -6, 3290), (7.995, -14, 3140), (8.0147, -18, 3120), (8.1394, -16, 4170),
          (8.146, -22, 4200)]


def cracks(leaf_db):
    """A stem gives way in a dry burst with a short note and two neighbouring pitches."""
    listed_cycles, stray_cycles = 19, 9
    stray_s, stray_db, place = stray_breaks(leaf_db, over_db=1.5, scatter_db=9.5, count=90)
    start_s, db, hz = np.hstack([np.transpose(CRACKS), [stray_s, stray_db, 1500 * 3 ** place]])
    impulses = np.zeros(N)
    impulses[np.round(start_s * SR).astype(int)] = amp(2 * (db + 4.5))
    burst = dying(impulses, t60=0.035)
    cracking = voiced(burst, TWIG) + voiced(burst, COARSE)
    cycles = np.where(np.arange(len(hz)) < len(CRACKS), listed_cycles, stray_cycles)
    detunes = rng.normal(0, 0.18, (len(hz), 2)).T
    notes = pings(start_s, db - 7.5, hz, cycles * np.exp(detunes[1]) / hz)
    neighbours = sum(pings(start_s, db - 17, hz * np.exp(step), t60=10 / hz) for step in detunes)
    cracking[0] += thinned(notes + neighbours)
    return cracking


def tines():
    """The steel rings on faintly after each listed crack of the raking."""
    start_s, db, hz = np.transpose([row for row in CRACKS if row[0] < HAND_FROM_S])
    return thinned(pings(start_s, db - 17, hz, t60=55 / hz))


# Tines, later the hand, biting into the litter close by: start_s, level_db, t60_s
BITES = [(0.503, -16, 0.24), (2.243, -31, 0.066), (3.063, -17.5, 0.08), (3.112, -20, 0.16),
         (3.357, -22, 0.062), (4.19, -31, .06), (4.215, -26, 0.047), (4.818, -30, 0.088)]


def bites():
    """A sudden crush as tines or fingers land, fading into the stroke."""
    power = sum((TIME_S >= start_s) * amp(2 * (db - 60 * np.clip(TIME_S - start_s, 0, 1) / t60))
                for start_s, db, t60 in BITES)
    return voiced(power, COARSE) + amp(-22) * voiced(power, LEAF) + amp(-7.5) * voiced(power, TWIG)


# Knocks on the ground and the sack: start_s, level_db, pitch_hz, t60_s
KNOCKS = [(0.503, -24.5, 453, 0.035), (3.5228, -17, 330, 0.016), (3.524, -15, 750, 0.016),
          (5.546, -23, 530, 0.041), (5.677, -20, 590, 0.034), (5.95, -28, 736, 0.11),
          (7.756, -23, 544, 0.088), (7.8, -28, 207, 0.046), (7.819, -23, 630, 0.045)]


def knocks():
    """Ground and sack answer a knock with a brief hollow note."""
    return pings(*np.transpose(KNOCKS))


# Litter going into the sack close by:
# full_s, release_s, level_db, release_db, rise_db_per_s, fall_db_per_s
SACK_FILLS = [(5.464, 5.72, -39.5, -35, 200, 100), (5.74, 5.84, -40, -40, 200, 148),
              (5.94, 5.99, -46, -45, 250, 150), (7.743, 7.86, -40, -35, 250, 76)]


def sack():
    """Litter tumbling inside the plastic sounds low and hollow."""
    level_db = swells(*np.transpose(SACK_FILLS), bed_db=-90) + 3.5 * wobble(40)
    grain = 0.55 + 0.66 * dying(fractures(400, spread_db=-1.5), t60=0.024)
    return voiced(amp(2 * level_db) * grain, HEAP)


def bump(at_s, level_db, pitch_hz, width_s):
    """One soft bump left of centre: a few low cycles under a bell curve."""
    t = TIME_S - at_s
    pulse = amp(level_db) * np.exp(-(t / width_s) ** 2) * np.cos(2 * np.pi * pitch_hz * t)
    return np.array([pulse, .3 * pulse])


# How widely the work spreads before the microphone: time_s, side_gain_db
WIDTH = [(0.0, -1.7), (0.4, -0.8), (0.8, -2.9), (1.2, 1.0), (1.6, -2.4), (2.0, 2.3), (2.4, -0.7),
         (2.8, 5.4), (3.2, 4.4), (3.6, 1.5), (4.0, 1.5), (4.4, -4.6), (4.8, -4.9), (5.2, -3.1), (5.6, 1.2),
         (6.0, 3.4), (6.4, -5.1), (6.8, -0.9), (7.2, -0.2), (7.6, -0.5), (8.0, 2.4)]
# How far each pitch leans to the side of the work: pitch_hz, lean_factor
LEAN = [(300, 0.05), (600, .15), (1500, 0.65), (2700, 1.1), (4500, .45), (7500, 1.2), (9500, 1.1),
        (12000, 0.15)]


def scene():
    """The work lies mostly left of the microphone; hum and tone sit in the centre."""
    leaf_db = strokes()
    work = litter(leaf_db) + leaf_snaps() + cracks(leaf_db)
    lows = rumble_and_shoves() + air() + bump(at_s=7.065, level_db=-44, pitch_hz=36, width_s=.03)
    mid, side = work + lows + bites() + sack()
    mid += flakes(leaf_db) + tines() + knocks()
    left_bias_db = curves(PATCH)[-1]
    pan = np.tanh(left_bias_db * np.log(10) / 40)
    side *= amp(curves(WIDTH)[0])
    side += pan * filtered(mid, lambda hz: along(LEAN, hz))
    mid += background_tone(HUM, waver_db=1) + background_tone(RISING_TONE, waver_db=1.5)
    return np.array([mid + side, mid - side])


def record(dry):
    """The loudest peaks bend near full scale; nothing passes above 15805 Hz."""
    bent = dry / (1 + np.abs(dry / .97) ** 8) ** (1 / 8)
    return filtered(bent, lambda hz: hz < 15805)


dry = scene()
out = record(dry)
dump_mix(out)
```